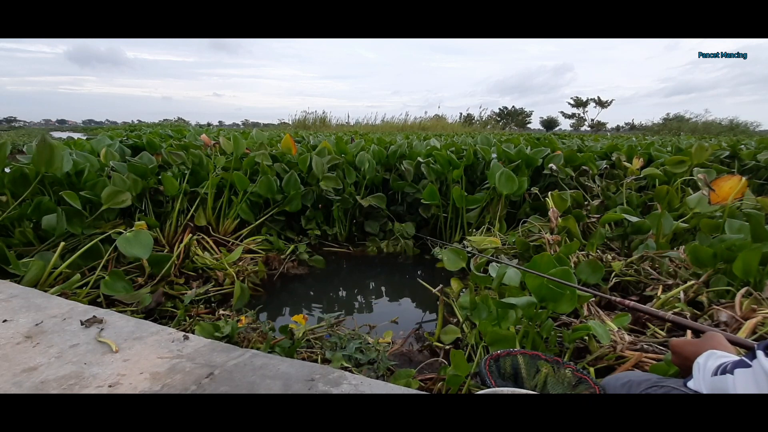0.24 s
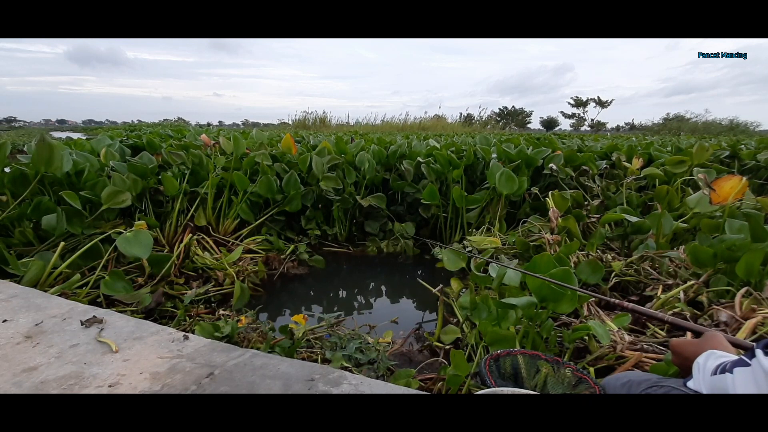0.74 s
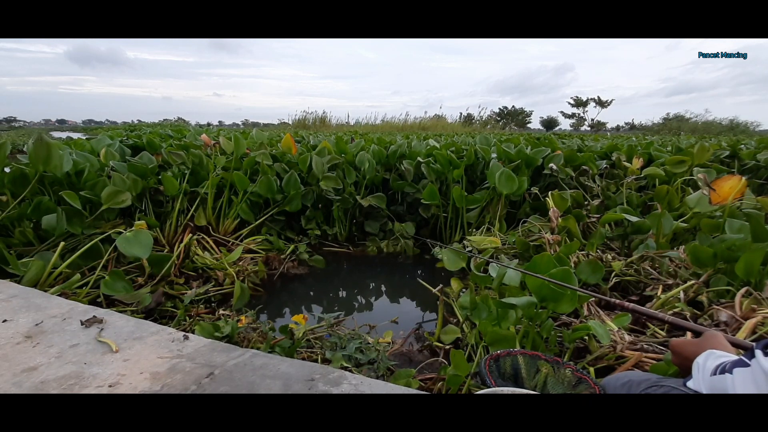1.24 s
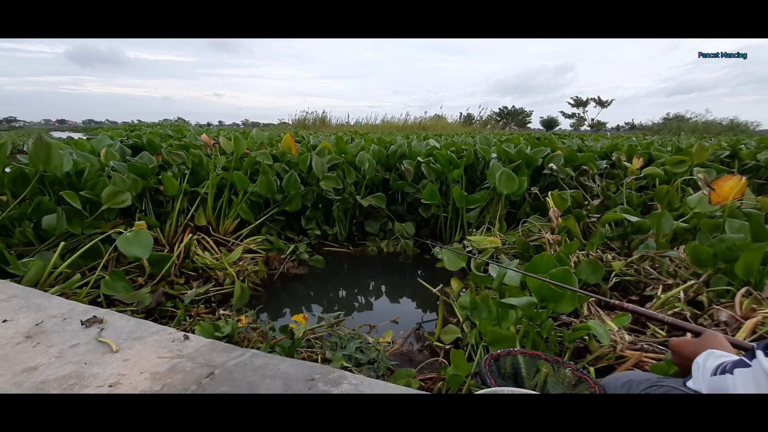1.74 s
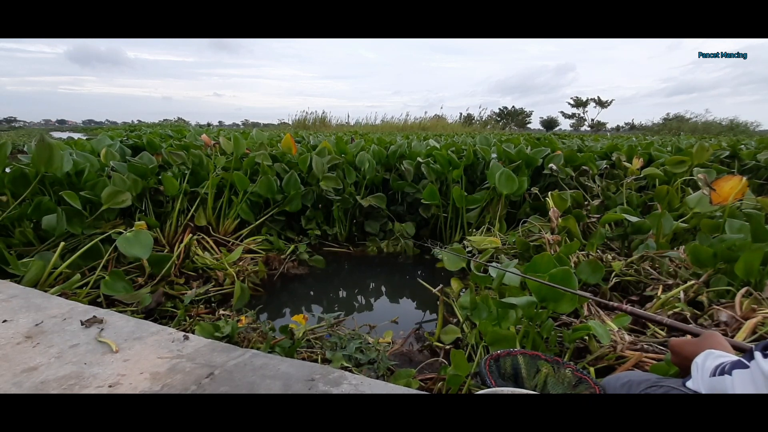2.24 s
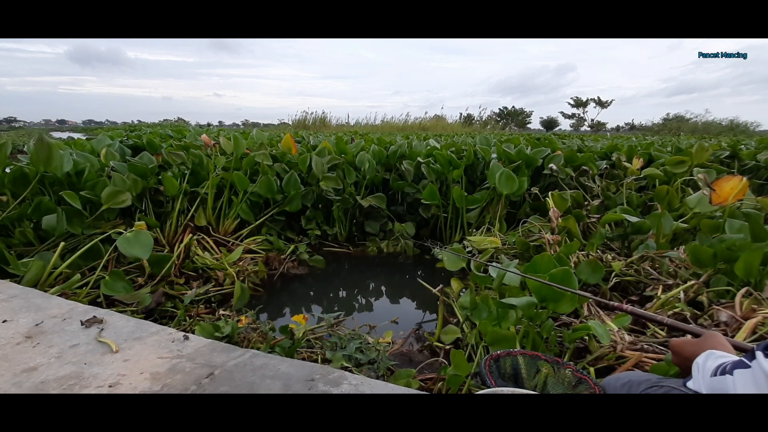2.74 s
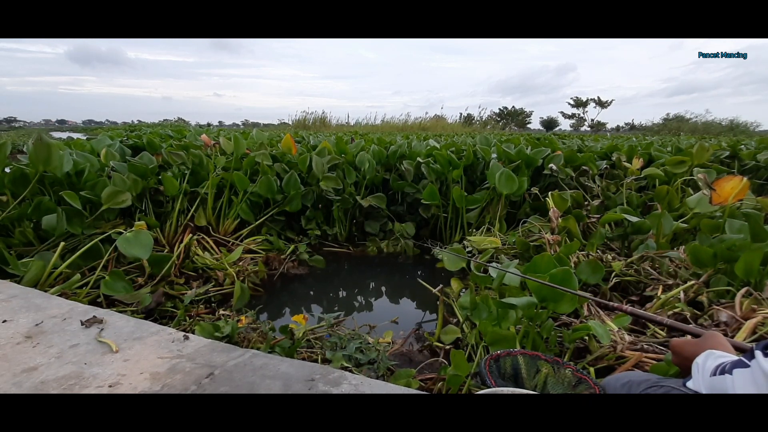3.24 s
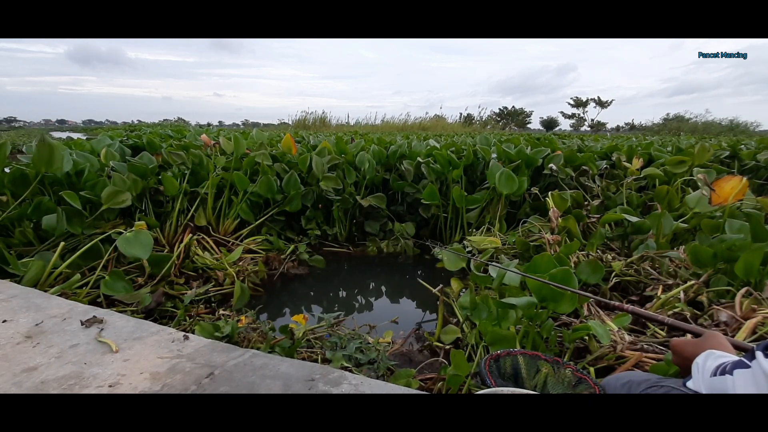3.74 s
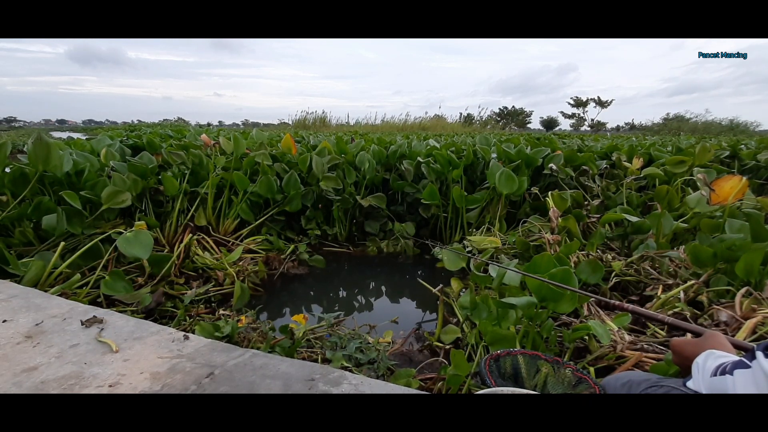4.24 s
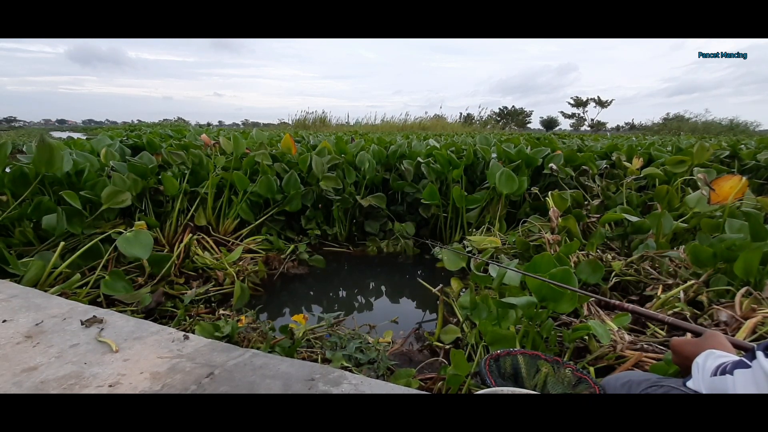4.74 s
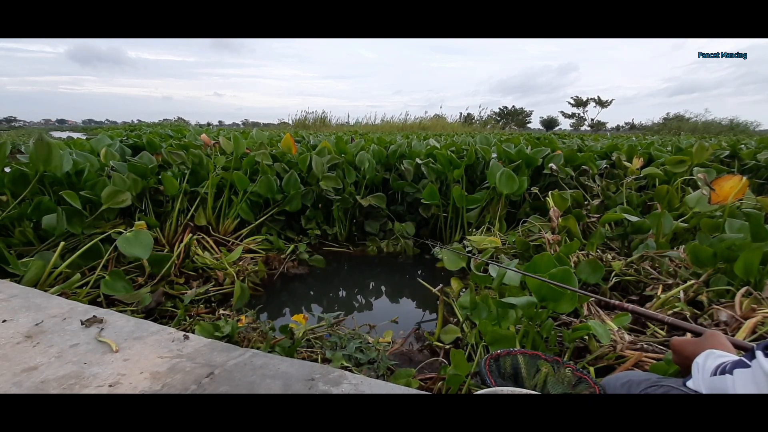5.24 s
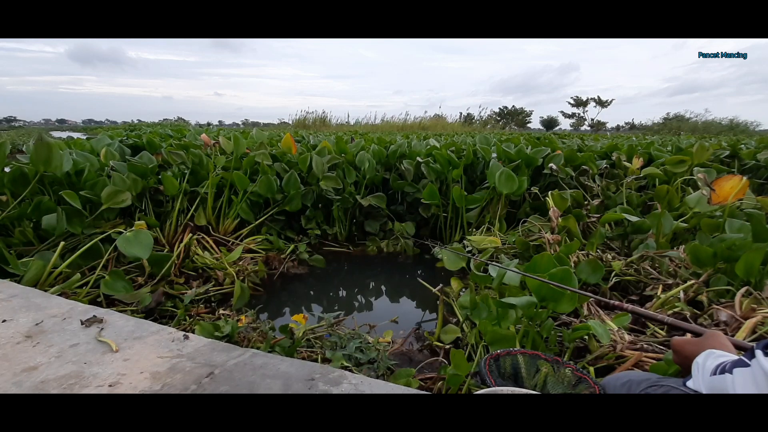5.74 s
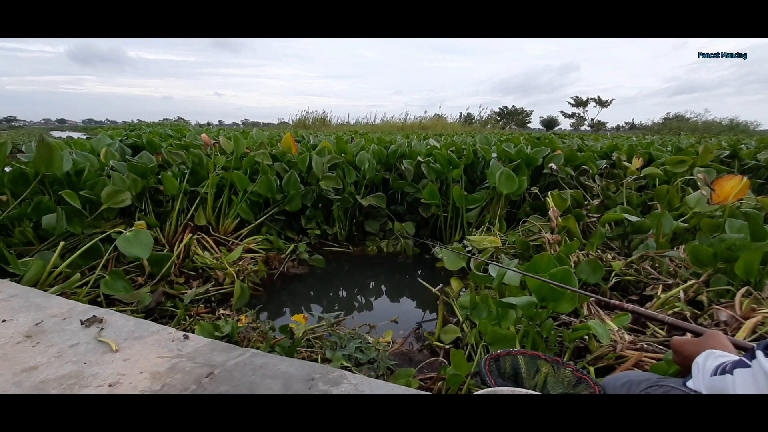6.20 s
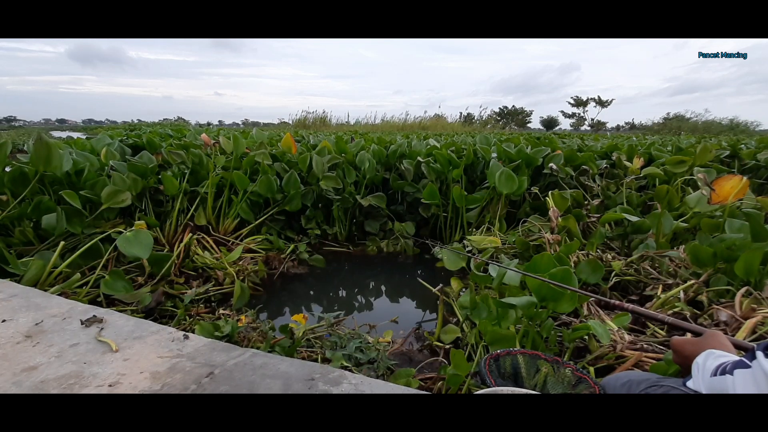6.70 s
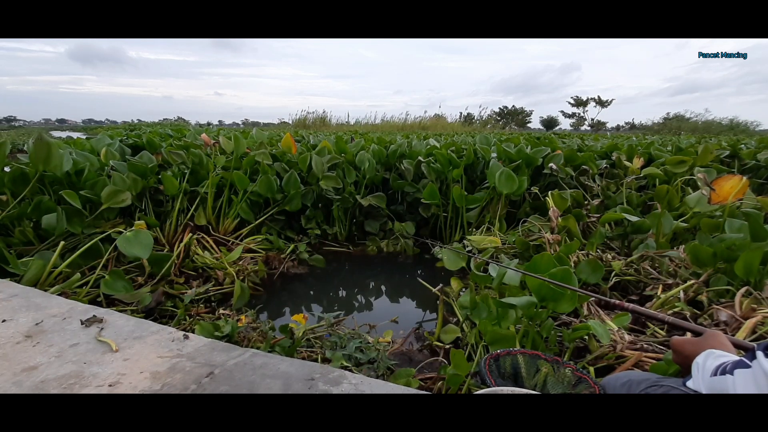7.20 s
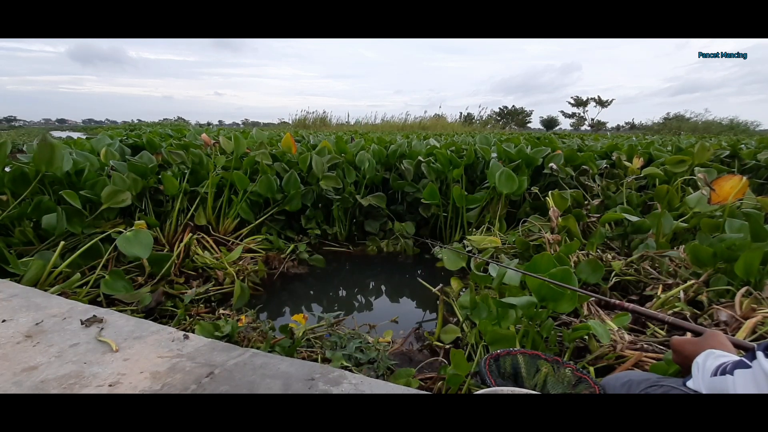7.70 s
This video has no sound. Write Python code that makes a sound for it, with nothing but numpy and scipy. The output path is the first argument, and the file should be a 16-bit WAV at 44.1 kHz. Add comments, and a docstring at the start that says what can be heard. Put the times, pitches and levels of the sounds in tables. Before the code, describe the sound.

An open-air pond bank with dense water plants, heard by a close stereo pair whose left side is muffled. Low wind rumble and soft thumps hit each side separately, busiest from 0 to 2 seconds, calmer around 2.6 to 4.4, then returning moderately. Far traffic rumbles throughout; a vehicle engine hum slides gradually lower from about 2 seconds, while a second low drone holds its pitch and grows after 6. At 1.4 seconds a short, hollow bubble plop with a little spray sounds among the plants, leaning left, with leaves rustling nearby; a second plop and trickle follows around 6.1. Small birds twitter quickly near 0.4 to 0.9, 2.3 to 2.9, 3.8 to 4.2, 5.7 and 7.3. Faint cicadas pulse on the right, joined by a higher insect at 4.5 to 6.2.

```python
"""The bank of an overgrown pond in an open field, with a pair of microphones, the left one covered.
Wind rolls over each port as bursts of low noise, above far traffic made of wavering noise bands.
One engine slows down and another drones, both as overtones of their firing rate. Gliding bubbles and
bursts of spray plop twice among the water plants; small birds twitter in swept tones.
On the right cicadas whine as throbbing bands of clicks; faint whines and leaf hiss fill the rest."""
import sys
import numpy as np
from scipy import signal
from scipy.fft import rfft, irfft
from scipy.io import wavfile
from scipy.ndimage import uniform_filter1d

SR = 44100
rng = np.random.default_rng(int(sys.argv[2]) if len(sys.argv) > 2 else 0)


def how_loud(loudness_db):
    """Turn decibels into a plain amplitude multiplier (0 dB gives 1, 20 dB gives 10)."""
    steps = np.asarray(loudness_db, float) / 20
    return 10 ** steps


def store_pcm(level_fs):
    """Save levels as 16-bit WAV."""
    pcm = np.round(np.clip(level_fs, -1, 1) * 32767).astype(np.int16)
    wavfile.write(sys.argv[1], SR, np.atleast_2d(pcm).T)


N = 351036
T = np.arange(N) / SR
PORT_LAG = 13  # samples by which the right microphone hears the road later


def noise():
    """White noise as long as the scene, with rms near 1."""
    return rng.standard_normal(N)


def curves(table):
    """Columns of a table joined by straight lines in time."""
    s, *columns = np.transpose(table)
    return [np.interp(T, s, c) for c in columns]


def band(x, hz, width_hz):
    """Bell-shaped band of x, scaled to rms 1."""
    f = np.arange(len(x) // 2 + 1) * SR / len(x)
    y = irfft(rfft(x) * np.exp(-2 * ((f - hz) / width_hz) ** 2), len(x))
    return y / np.sqrt(np.mean(y ** 2))


def walk(rate):
    """Random levels held 1 / rate s and slewed twice; spread near 1."""
    k = int(SR / rate)
    held = np.repeat(rng.standard_normal(N // k + 1), k)
    return uniform_filter1d(uniform_filter1d(held, k), k)[:N] * 4 / 3


def place(x, pan_db, lag=0):
    """Share x between the microphones; the right one hears it lag samples late."""
    late = x[np.clip(np.arange(N) - int(lag), 0, N - 1)]
    return np.array([x * how_loud(pan_db / 2), late * how_loud(-pan_db / 2)])


def scatter(x, t60, db):
    """Blurred echo from plants and bank, different at each microphone."""
    t = T[:SR // 3]
    tails = rng.standard_normal((2, len(t))) * how_loud(db - 60 * t / t60) * (t > .005)
    return np.array([signal.fftconvolve(x, tail)[:N] for tail in tails])


# gusting wind at both ports, swelling and sinking: (time [s], relative level [dB])
WIND_LEVEL = [(0, -24), (1.35, -35.5), (1.8, -24), (2.6, -43), (4.35, -47.5), (4.8, -36), (5.3, -34.5),
              (6, -44.5), (6.4, -34.5), (7.96, -31.5)]
# colour of wind at a port: (centre [Hz], width [Hz], relative level [dB])
WIND_COLOUR = [(38.7, 17, -13), (64, 44, -4), (91, 42, -0.5), (135, 102, -6), (257, 230, -18.5)]
# single eddies that thump the ports:
# (middle [s], length [s], relative level at the louder port [dB], left minus right [dB])
EDDIES = [(0.265, 0.048, -5.5, 18), (0.538, 0.024, -13.5, -1.5), (0.854, 0.019, -14, 8),
          (1.03, 0.061, -10, 2), (1.563, 0.049, -16.5, -31), (1.733, 0.03, -3.5, -18),
          (2.19, 0.027, -11.5, -12), (2.718, 0.022, -19.5, -12), (4.08, 0.038, -24, -13),
          (4.605, 0.12, -19, -2), (4.874, 0.02, -17.5, -19), (6.252, 0.055, -12, 15),
          (6.391, 0.053, -21, -10), (6.796, 0.039, -15, -25), (7.239, 0.053, -16, 14)]


def wind():
    """Eddies roll over each port on their own, so the two sides thump apart."""
    flow = np.array([sum(how_loud(db) * band(noise(), f, w) for f, w, db in WIND_COLOUR) for _ in range(4)])
    gusting, thumping = flow[:2], flow[2:]
    flutter_db = 5.5 * np.array([walk(8.7), walk(13.0)])
    out = gusting * how_loud(curves(WIND_LEVEL)[0] + flutter_db)
    for s, length, db, pan_db in EDDIES:
        shape = np.exp(-2 * ((T - s) / length) ** 2)
        thump = thumping * shape
        size = np.sqrt(np.sum(thump ** 2, axis=1) / np.sum(shape ** 2))
        port_db = db + np.minimum([pan_db, -pan_db], 0)
        out += thump * (how_loud(port_db) / size)[:, None]
    return out


def engine(table, exhaust, wobble):
    """Overtones of the firing rate, each as loud as the exhaust passes its pitch; the air makes each waver."""
    hz, level_db, tilt_db = curves(table)
    phase = 2 * np.pi * np.cumsum(hz * (1 + wobble * walk(5.))) / SR
    pipe_hz, pipe_db = np.transpose(exhaust)
    out = 0
    for k in range(2, 14):
        exhaust_db = np.interp(np.log(k * hz), np.log(pipe_hz), pipe_db)
        bright_db = tilt_db * np.log2(k * hz / 140)  # brightness tilts the overtones around 140 Hz
        level = how_loud(level_db + exhaust_db + bright_db + 3.3 * walk(5.))
        out = out + level * np.sin(k * phase + 2 * np.pi * rng.random())
    return place(np.sqrt(2) * out, -1.2, PORT_LAG)


# a vehicle that slows down:
# (time [s], mean firing rate [Hz], relative level [dB], brightness [dB per octave])
SLOWING_COURSE = [(0.0, 49.64, -23, -2), (0.8, 49.73, -25, 2.5), (1.2, 49.8, -34, 12),
                  (1.8, 50.07, -29.5, 10.5), (2.1, 47.59, -26, -4.5), (3.0, 41.18, -25, -2.5),
                  (3.6, 38.95, -25, 2), (4.0, 38.97, -27.5, -8), (4.5, 37.66, -48.5, 18),
                  (6.0, 37.64, -29, 3), (6.4, 36.54, -23.5, -6.5), (7.2, 34.09, -27.5, 1),
                  (7.6, 32.71, -23.5, -2), (7.96, 31.19, -22.5, -1.5)]
# what its exhaust passes: (frequency [Hz], relative level [dB])
SLOWING_PIPE = [(65, -19.5), (90, -7.5), (110, 1), (140, 0.5), (170, -12), (200, -9), (250, -20),
                (350, -19), (420, -34.5), (650, -53.5)]


def slowing_engine():
    """The firing rate sinks, so all overtones slide down together through the fixed exhaust colour."""
    return engine(SLOWING_COURSE, SLOWING_PIPE, wobble=0.002014)


# an engine at steady speed that draws nearer:
# (time [s], mean firing rate [Hz], relative level [dB], brightness [dB per octave])
DRONING_COURSE = [(0, 28.4, -28, 1.5), (1.2, 28.52, -29.5, 0), (1.8, 28.5, -44.5, -3),
                  (2.6, 28.55, -30.5, 1), (3.5, 28.16, -40.5, 0.5), (4.3, 28.06, -35, 5),
                  (5.3, 28.3, -35, -6), (6.0, 28.34, -26.5, -1.5), (6.6, 28.2, -26, -0.5),
                  (7.0, 28.23, -21.5, -3), (7.6, 28.32, -20, 5.5), (7.96, 28.37, -20.5, 6)]
# what its exhaust passes: (frequency [Hz], relative level [dB])
DRONING_PIPE = [(85, -27), (113, -8), (141, -2), (170, 0), (198, -12), (226, -19), (283, -20.5), (370, -39)]


def droning_engine():
    """The firing rate hardly moves, so the overtones nearly stand still while their level changes."""
    return engine(DRONING_COURSE, DRONING_PIPE, wobble=0.00203)


# bubbles: (time [s], relative level [dB], start [Hz], end [Hz], time to fall 60 dB [s])
POND_BUBBLES = [(0.117, -35.5, 903, 933, 0.088), (1.236, -36, 1090, 1300, 0.067),
                (1.276, -26, 1015, 1100, 0.031), (1.279, -41, 2870, 3200, 0.044),
                (1.474, -34.5, 1780, 2100, 0.026), (1.397, -35, 1210, 960, 0.065),
                (1.413, -18.5, 850, 696, 0.037), (1.42, -18.5, 730, 620, 0.039),
                (1.414, -26.5, 894, 880, 0.057), (1.418, -38, 2186, 2390, 0.07),
                (1.436, -39, 2180, 2070, .07), (6.054, -30, 500, 1660, 0.0394),
                (6.0655, -22, 1530, 1040, 0.017), (6.0935, -17, 1280, 595, 0.011),
                (6.096, -26, 539, 500, 0.053), (6.103, -35, 567.9, 1190, 0.1),
                (6.117, -30.5, 993, 900, 0.046), (6.164, -34, 1150, 1200, 0.037),
                (6.254, -40, 1478, 1708, 0.074), (6.271, -47, 2650, 2580, 0.2)]
# spray: (time [s], relative level [dB], centre [Hz], width [Hz], time to fall 60 dB [s])
POND_SPRAY = [(1.384, -55, 10900, 9200, 0.1), (1.408, -37.5, 12700, 2500, .05),
              (1.415, -49.5, 12000, 5000, .2), (1.408, -44.5, 7000, 9000, .03),
              (1.47, -55.5, 13000, 2970, 0.13), (1.411, -28, 1090, 1599, 0.12),
              (1.4114, -41.5, 2500, 1100, 0.17), (1.434, -46, 5000, 5000, 0.13),
              (6.04, -56, 4840, 1200, .25), (6.02, -39, 1200, 1900, 0.43), (6.063, -48.5, 3480, 3976, 0.25),
              (6.092, -35, 2500, 3000, 0.025), (6.1, -47.5, 1800, 3000, 0.73),
              (6.069, -55.5, 12000, 7940, 0.28), (6.251, -47, 1800, 2200, 0.5)]


def water():
    """A bubble glides in pitch as its shape and depth change, and dies away; spray is a burst of fading noise."""
    bubbles, spray, t = np.zeros(N), np.zeros((2, N)), T[:SR // 3]
    for s, db, start, end, t60 in POND_BUBBLES:
        hz = end + (start - end) * np.exp(-3 * t / t60)
        level = how_loud(db - 60 * t / t60) * np.clip(t / 0.0006, 0, 1)
        i = int(s * SR)
        bubbles[i:i + len(t)] += level * np.sin(2 * np.pi * np.cumsum(hz) / SR)
    for s, db, hz, width_hz, t60 in POND_SPRAY:
        level = how_loud(db - 60 * t / t60) * np.clip(t / 0.0029, 0, 1)
        i = int(s * SR)
        for ch in range(2):
            # grains of 64 samples, a few far louder than the rest
            grain_db = 1.7 * rng.exponential(size=len(t) // 64 + 1).repeat(64)[:len(t)]
            drops = rng.standard_normal(len(t)) * how_loud(grain_db)
            spray[ch, i:i + len(t)] += band(drops, hz, width_hz) * level
    spray_sides = how_loud(np.array([[-3], [2.5]]))
    return place(bubbles, -9.5, -2) + spray * spray_sides + scatter(bubbles, t60=.15, db=-31)


# arched whistles: (time [s], length [s], top before the scoop is taken off [Hz], fall [Hz], relative level [dB])
BIRD_WHISTLES = [(0.069, 0.098, 3980, 246, -58), (0.078, .03, 4500, 199.5, -64),
                 (0.15, .115, 4620, 55, -62), (0.39, 0.058, 4750, 296.5, -58),
                 (0.407, .075, 3930, -130, -51), (0.677, 0.032, 4020, 56, -41.5),
                 (0.75, 0.043, 4070, -3, -55), (2.163, 0.01, 6220, 84, -46),
                 (2.356, 0.082, 3970, 107, -49.5), (2.63, 0.022, 3880, 298, -54.5),
                 (2.712, .115, 4130, 419.5, -46.5), (2.81, 0.055, 4130, 0, -60),
                 (2.855, .035, 4500, 252, -57), (2.932, 0.091, 4550, 171, -55),
                 (3.628, 0.014, 4028, 99, -53), (3.735, .04, 4040, 249, -56), (3.969, 0.023, 4086, -4, -43),
                 (4.062, .035, 4040, 0, -54), (4.56, 0.03, 5760, -3, -56), (5.655, 0.039, 4030, 117, -57),
                 (5.705, 0.022, 4070, 199, -57), (5.758, 0.1, 4170, 486, -49), (5.805, .04, 4600, 2, -63),
                 (7.827, 0.045, 4432, -1.5, -57.5), (7.918, 0.052, 4560, 99, -57)]
# single steep chirps: (time [s], start [Hz], end [Hz], relative level [dB])
BIRD_CHIRPS = [(0.52, 4350, 4070, -50), (0.595, 4060, 3630, -54), (0.715, 4320, 3530, -40),
               (0.738, 3710, 2900, -49), (0.758, 3290, 2820, -51), (0.79, 3130, 2750, -43),
               (0.798, 4140, 3600, -51), (0.835, 2900, 3850, -43), (0.857, 3950, 2800, -44),
               (0.86, 4750, 4350, -49), (2.395, 4100, 3500, -46.5), (2.418, 3750, 3200, -48.5),
               (5.688, 3860, 3098, -49), (5.785, 3310, 2920, -50), (5.812, 3300, 2790, -53),
               (3.908, 3680, 3350, -49), (2.462, 3900, 2800, -48), (2.28, 4100, 3700, -55),
               (5.743, 3280, 2750, -50), (2.508, 3200, 4300, -50), (2.525, 3800, 3500, -44),
               (2.538, 3840, 3000, -46), (2.54, 4890, 4600, -52), (3.81, 4230, 3950, -55),
               (3.83, 4130, 3910, -53), (3.878, 4300, 3400, -51), (3.935, 4250, 3740, -54),
               (3.946, 3470, 2850, -50), (3.998, 4210, 3400, -40), (4.028, 3700, 3400, -38),
               (4.074, 2800, 3350, -39), (4.085, 3280, 2800, -45), (4.118, 3370, 3900, -39),
               (4.13, 3080, 3320, -43), (4.147, 3900, 2980, -42.5), (7.19, 4300, 3950, -52),
               (7.213, 4210, 3630, -47.5), (7.232, 4000, 2950, -49.5), (7.285, 3360, 2835, -40),
               (7.33, 2940, 3720, -35.5), (7.355, 3780, 2810, -42)]
# hurried twitter of fainter, mostly falling chirps:
# (time [s], length [s], highest start [Hz], guide for the low end [Hz], relative level of the loudest [dB])
BIRD_CHATTER = [(0.447, .2, 4300, 3380, -54), (0.724, .24, 4300, 2720, -49), (2.031, 0.36, 4370, 3698, -58),
                (2.386, .2, 4430, 3290, -55), (3.798, .17, 4530, 3360, -51.5),
                (4.014, 0.19, 3880, 2730, -54.5), (5.641, .3, 4390, 2800, -53.5),
                (7.2, 0.24, 4170, 2890, -56)]


def chatter():
    """Runs of 80 chirps a second at random moments and pitches; three in ten sweep up."""
    chirps = []
    for s, length, top, bottom, db in BIRD_CHATTER:
        for when, low, fall, soft, turn in rng.random((int(length * 80), 5)):
            start = bottom + (top - bottom) * (1 - 0.17 * when - 0.65 * low)
            end = max(start - 300 - 800 * fall, bottom - 300)
            if turn < .3:
                start, end = end, start
            chirps.append((s + when * length, start, end, db - 8 * soft))
    return chirps


def birds():
    """Whistles scoop up and droop; chirps sweep straight and fast, singly or in hurried runs."""
    notes, out = [], np.zeros(N + SR)
    for s, start, end, db in list(BIRD_CHIRPS) + chatter():
        length = .005 + abs(start - end) / 95000  # seconds; wider sweeps last longer
        notes.append((s, db, np.linspace(start, end, int(length * SR))))
    for s, length, top, fall, db in BIRD_WHISTLES:
        t = T[:int(length * SR)]
        droop = np.clip((t / length - .25) / .75, 0, 1) ** 2  # begins a quarter of the way in
        scoop_hz = 4500 * length * np.exp(-t / .007)  # deeper into long notes
        notes.append((s, db, top - fall * droop - scoop_hz))
    for s, db, hz in notes:
        i = int(s * SR)
        shape = np.sin(np.linspace(0, np.pi, len(hz))) ** .6
        out[i:i + len(hz)] += how_loud(db) * shape * np.sin(2 * np.pi * np.cumsum(hz) / SR)
    out = out[:N] * how_loud(2.8 * walk(160.))  # moving air roughens the notes on their way
    return place(out, -7, -4) * how_loud(-3.5) + scatter(out, t60=.28, db=-34.5)


# groups of cicadas, each with its own steady throb: (rate [throbs per s], a throb's peak [s], relative depth [dB])
CICADA_GROUPS = [(6.7, .068, 1.44), (6.145, .147, 1.06), (7.065, .099, .84), (6.31, .02, .76)]
# ringing of their bodies: (centre [Hz], width [Hz], relative level [dB])
CICADA_RING = [(7120, 250, -60), (7160, 606, -52.5), (7760, 1700, -64)]
# a second, higher insect: (time [s], relative level [dB])
HIGH_INSECT_LEVEL = [(4.3, -77.5), (4.7, -63), (5.8, -58), (6.21, -57), (6.24, -78.5)]
# ringing of its body: (centre [Hz], width [Hz], relative level [dB])
HIGH_INSECT_RING = [(8050, 570, 1), (7620, 300, -2.5)]


def cicadas():
    """Dense clicks ring the insects' bodies; the groups drift in and out of step, so the throb deepens and fades."""
    throb_db = sum(db * np.cos(2 * np.pi * rate * (T - peak)) for rate, peak, db in CICADA_GROUPS)
    clicks = noise() * how_loud(1.3 * walk(120.))
    ring = sum(how_loud(db) * band(clicks, f, w) for f, w, db in CICADA_RING)
    joins = np.clip((T - 6.42) / .3, 0, 1)  # one deeper voice joins late
    ring = ring + how_loud(-58.5) * band(clicks, 6920, 380) * joins
    chorus = ring * how_loud(1.09 * throb_db + 0.07 * T)  # the chorus swells by 0.07 dB per s
    high = sum(how_loud(db) * band(noise(), f, w) for f, w, db in HIGH_INSECT_RING)
    high = high * how_loud(curves(HIGH_INSECT_LEVEL)[0])
    return np.array([np.zeros(N), chorus + high])


# two faint whines: (middle [s], length [s], centre [Hz], relative level [dB])
FAINT_WHINES = [(1.86, .4, 1745, -57), (1.98, .36, 1350, -57)]


def whines():
    """Bands of noise 60 Hz wide that swell and fade, a little louder on the right."""
    out = 0
    for s, length, f, db in FAINT_WHINES:
        swell = np.exp(-8 * ((T - s) / length) ** 2)
        out = out + band(noise(), f, 60) * how_loud(db) * swell
    return place(out, -1.0)


# swell of the far road, added to its colour: (time [s], relative rumble level [dB], relative hiss level [dB])
ROAD_SWELL = [(0.0, -28.5, -62), (1.51, -27.5, -57), (2.26, -29.5, -63.5), (3.5, -30.5, -63.5),
              (4.48, -31, -67), (7.32, -30, -66.5), (7.6, -31.5, -63), (7.96, -33, -65.5)]
# colour of far traffic:
# (frequency [Hz], relative level [dB], likeness of the two microphones [0-1], left minus right [dB])
ROAD_COLOUR = [(39.8, -18.5, .9, -1), (59, -8, 1, 1.4), (107.5, 1, 1, -2), (177, 1, 0.98, -2),
               (268.5, -9, 0.89, -2), (500, -15.5, 0.84, -0.2), (610, -17, .78, -2.5),
               (800, -20.5, 0.4, -2), (1170, -17, 0.9, -4), (1650, -20, 0.49, -1.5), (2560, -25.5, 0, -1)]


def far_traffic():
    """Noise in third-octave bands: part reaches both microphones alike, every band wavers alone."""
    rumble_db, road_db = curves(ROAD_SWELL)
    hz, *columns = np.transpose(ROAD_COLOUR)
    out = 0
    for f in 40 * 2 ** (np.arange(19) / 3):
        db, like, pan = (np.interp(np.log(f), np.log(hz), c) for c in columns)
        like = np.clip(like, 0, 1)
        high = np.clip(np.log2(f / 450) / 0.97, 0, 1)  # 0 follows the rumble, 1 the road hiss
        swell_db = high * (road_db + 22.5) + (1 - high) * (rumble_db + 1)
        waver_db = 1.5 * walk(6.) + 1.5 * high * walk(2.5)
        shared, left, right = (band(noise(), f, f / 4) for _ in range(3))
        apart = np.array([left * how_loud(pan / 2), right * how_loud(-pan / 2)])
        pair = np.sqrt(like) * place(shared, pan, PORT_LAG) + np.sqrt(1 - like) * apart
        out = out + pair * how_loud(db + swell_db + waver_db)
    return out


# still hiss of leaves and of the microphones: (frequency [Hz], relative left level [dB], relative right level [dB])
STILL_HISS = [(2000, -76, -78), (3200, -70, -68.5), (4600, -74, -67.5), (5500, -76.5, -71),
              (7300, -87.5, -56), (8360, -78, -62), (9600, -74.5, -71), (12500, -66.5, -68),
              (16000, -68, -68)]
# brief swells of hiss on the right, mostly stirred leaves: (middle [s], length [s], centre [Hz], level [dB])
LEAF_SWELLS = [(1.23, 0.088, 4260, -54), (1.36, .28, 5100, -60), (1.4, .1, 4900, -61),
               (3.4, 0.28, 5500, -61), (4.9, 0.087, 4860, -63), (6.9, 0.18, 4850, -67),
               (1.6, 0.49, 2000, -51.5), (2.12, .12, 4750, -64), (3.68, .12, 4720, -63),
               (1.06, 0.088, 4400, -57.5)]


def hiss():
    """Noise unrelated in the two microphones; leaves stir now and then."""
    hz, *sides = np.transpose(STILL_HISS)
    breeze = walk(4.5)
    out = np.zeros((2, N))
    for f in 2000 * 2 ** (np.arange(19) / 6):
        stir_db = (1.5 * breeze + 1.8 * walk(9.)) * (f < 6500)
        for ch, side_db in enumerate(sides):
            db = np.interp(np.log(f), np.log(hz), side_db) - 3.5
            out[ch] += band(noise(), f, f / 8) * how_loud(db + stir_db)
    for s, length, f, db in LEAF_SWELLS:
        swell = np.exp(-2 * ((T - s) / length * 2) ** 2)
        out[1] += band(noise(), f, 1100) * how_loud(db) * swell
    return out


def scene():
    """Everything around the pond; the left microphone is covered and loses the treble of near sounds."""
    near = birds() + water()
    cover = signal.butter(4, 4300, fs=SR, output="sos")  # low-pass at 4300 Hz
    near[0] = signal.sosfilt(cover, near[0])
    road = slowing_engine() + droning_engine() + far_traffic()
    return wind() + road + near + cicadas() + whines() + hiss()


def low_pass(x):
    """Removes everything above the highest recorded frequency."""
    return signal.sosfilt(signal.butter(12, 15390, fs=SR, output="sos"), x)


def record(dry):
    """The input stage cuts the deepest bass, the tallest thumps touch its ceiling, and both ends fade."""
    ceiling, fade_s = .97, .008
    cut = signal.sosfilt(signal.butter(4, 40, "high", fs=SR, output="sos"), dry)
    limited = ceiling * np.tanh(np.sinh(cut / ceiling))  # nearly straight, then bends over at the ceiling
    fade = np.sin(np.clip(np.minimum(T, T[-1] - T) / fade_s, 0, 1) * np.pi / 2) ** 2
    return low_pass(fade * limited)


dry = scene()
out = record(dry)
store_pcm(out)
```